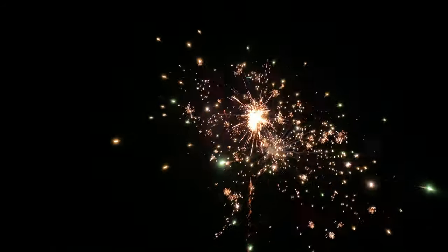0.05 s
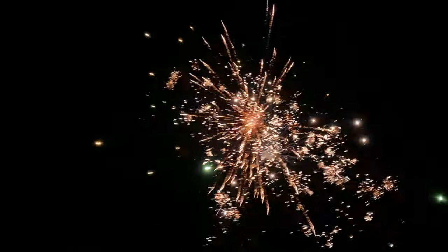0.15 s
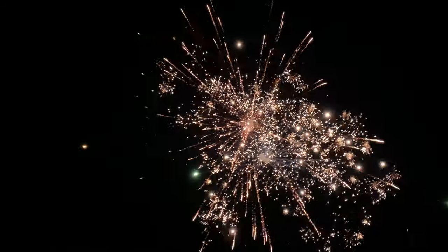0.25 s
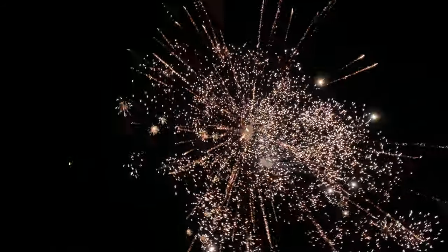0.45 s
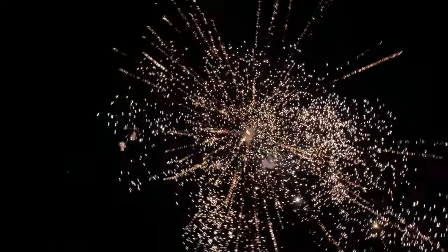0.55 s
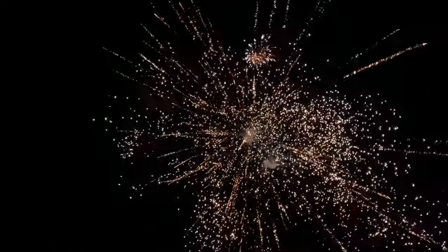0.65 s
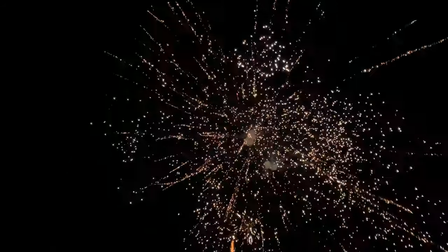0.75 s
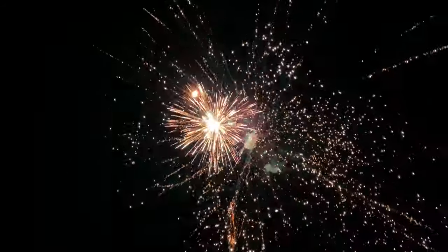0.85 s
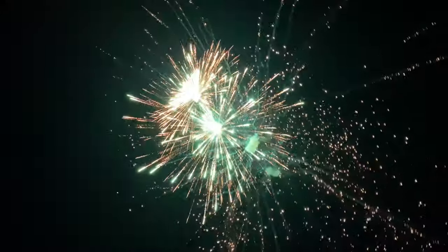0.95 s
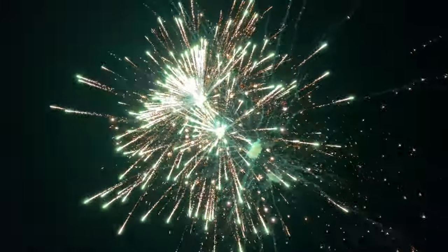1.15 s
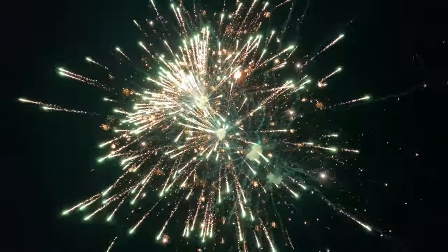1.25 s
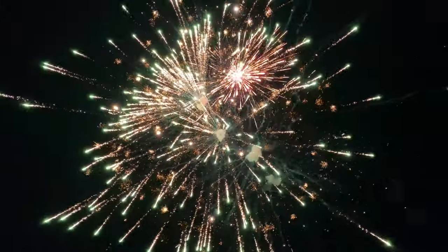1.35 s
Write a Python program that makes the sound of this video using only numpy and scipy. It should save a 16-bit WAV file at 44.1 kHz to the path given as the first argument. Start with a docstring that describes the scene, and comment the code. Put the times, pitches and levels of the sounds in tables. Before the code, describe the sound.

Fireworks explode in the open night air. A dull thump opens over faint rumble and light sizzle; a hard, cracking bang hits at 0.2 seconds with a quick slap-back and low roll. Crackle swells around 0.4-0.7, with a short rasp and thump at 0.55, a weaker one at 0.7, and pops until 0.9. Two bangs strike at 1.02 and 1.08, echoing into sizzle until about 1.4.

```python
"""Fireworks outdoors at night

Three hard bangs, each a pressure pulse with a noisy crack, a slap-back and a low rolling echo of shaped noise.
Two short rasps of resonant noise each end in a thump, a dull pressure pulse; two more thumps stand alone.
Random impulses sizzle and tick, single clicks pop, and low noise rumbles faintly beneath.
All-pass dispersion delays the lows behind the highs, so each bang sweeps downward."""
import sys
import numpy as np
from scipy import signal
from scipy.fft import rfft, irfft
from scipy.io import wavfile

SR = 44100
rng = np.random.default_rng(int(sys.argv[2]) if len(sys.argv) > 2 else 0)


def unload_audio(sound):
    """Save the sound as a 16-bit wav file, at the path given as the first command line argument."""
    columns = np.transpose(np.atleast_2d(sound))
    # keep every value between -1 and 1, then stretch to whole-number steps
    steps = np.round(np.clip(columns, -1, 1) * 32767)
    wavfile.write(sys.argv[1], SR, steps.astype(np.int16))


N = 61739
SIZE = 2 ** 17  # transform length, longer than the scene
FREQ = np.arange(SIZE // 2 + 1) * SR / SIZE  # Hz
TIME = np.arange(N) / SR  # s

# level of the sizzle and its ticks over time: (time [s], level [dB])
SIZZLE_LEVEL = [(0, -48), (.13, -63), (.2, -50), (.3, -53), (.4, -40), (.48, -37), (.535, -37),
                (.62, -45.5), (.68, -37.5), (.74, -39), (.8, -44), (.88, -47.5), (.93, -58.5), (1, -55),
                (1.2, -47), (1.31, -52), (1.4, -40.5)]
# colour of a star's snap: (frequency [Hz], gain [dB])
STAR_COLOUR = [(100, -27), (600, 4), (1500, 7.5), (3000, 1), (5500, 0), (9000, -12), (16000, -25.5)]
# spectrum of noise scattered off nearby things: (frequency [Hz], relative density [dB per Hz])
SCATTER_SPECTRUM = [(100, 3.5), (600, 8.5), (1500, 3.5), (2800, -7), (4500, -5.5), (6500, -10), (9000, -17),
                    (11000, -33), (12500, -37), (16000, -40.5)]

DIFFUSE_WIDTH, BASS_WIDTH, CRACK_WIDTH = 0.9, 0.54, 0.73  # gain of side relative to mid
SIZZLE_PER_S, SIZZLE_SPREAD_DB = 3300, 3.5  # rate in mid and in side; dB per unit exponential draw
TICKS_PER_S, TICKS_DB, TICKS_SPREAD_DB = 140, 12.5, 3  # size of the least tick, before the channel gains
BLAST_LOW_HZ = 69
AIR_DB, AIR_RISE_S, AIR_DECAY_S = -31, 0.0079, 0.1  # echo levels hold for the loudest blast
ROLL_DB, ROLL_DELAY_S, ROLL_RISE_S, ROLL_DECAY_S = -24.5, 0.095, 0.0078, 0.041
BOOM_HZ, BOOM_DB, BOOM_DELAY_S, BOOM_WIDTH_S = 52.05, -31.5, 0.12, 0.084  # half-width to 1/e
CRACK_S, SCATTER_S, SCATTER_DB = 0.0037, 0.0088, -2.5  # decay times; scatter level relative to the crack
RASP_FALL_S, RASP_OVERLAP_S, RASP_RING_Q = 0.0015, 0.0017, 28
RASP_TAIL_DB, RASP_TAIL_S = -11, 0.014  # level relative to the burst; decay time
POP_S, POP_NOISE_DB, POPS_DB = 0.0021, -15, -8  # fizz decay, fizz relative to click, gain of all pops
SWEEP_LOW_HZ, SWEEP_HIGH_HZ, SWEEP_DAMPING = 81, 767, 2.72
CEILING, TOP_HZ = 1.0, 16000


def undb(db):
    """Amplitude gain is ten to the power of decibels over twenty."""
    return 10 ** (np.asarray(db) / 20)


def filtered(x, response):
    """Linear filtering: the spectrum is multiplied by a frequency response."""
    return irfft(rfft(x, SIZE) * response, SIZE)[..., :N]


def colour(points):
    """Minimum phase: folding the cepstrum makes a causal response through (Hz, dB) points."""
    hz, db = np.array(points, float).T
    level_db = np.interp(np.log(FREQ + 1), np.log(hz), db)
    cepstrum = irfft(np.log(undb(level_db)))
    return np.exp(rfft(2 * cepstrum[:SIZE // 2], SIZE) - cepstrum[0])


def delay(seconds):
    """A pure delay is a phase lag proportional to frequency."""
    return np.exp(-2j * np.pi * FREQ * seconds)


def place(x, pan_db, lag_ms=0):
    """Binaural cues: level and arrival time differ between left and right."""
    sides = np.array([[.5], [-.5]])
    return filtered(x, undb(pan_db * sides) * delay(sides * lag_ms / 1000))


def spread(pair, points, width):
    """Mid-side stereo: an unrelated side signal lowers the channel correlation; rms 1."""
    mid, side = filtered(pair, colour(points))
    out = np.array([mid + width * side, mid - width * side])
    return out / np.sqrt(np.mean(out ** 2))


def noise(points, width):
    """Spectral shaping of white noise into coloured stereo noise."""
    return spread(rng.standard_normal((2, N)), points, width)


def fade(start, decay, rise=1e-4):
    """Exponential relaxation: a rise at start and a decay to silence."""
    age = np.maximum(TIME - start, 0)
    return (1 - np.exp(-age / rise)) * np.exp(-age / decay)


def curve(rows):
    """Gain that moves linearly in decibels between (s, dB) points."""
    return undb(np.interp(TIME, *np.array(rows).T))


def rumble():
    """Low-frequency noise under a slowly varying level is heard as a far rumble."""
    # level over time: (time [s], level [dB])
    rumble_level = [(0, -43.5), (.05, -43.5), (.12, -44.5), (.2, -43), (.45, -49.5), (.6, -45.5),
                    (.66, -47), (.76, -43.5), (.82, -47), (.96, -53), (1.15, -43), (1.32, -44), (1.4, -41)]
    # (frequency [Hz], relative density [dB per Hz])
    rumble_spectrum = [(20, -27), (45, -9), (80, 3), (160, 1), (270, -3.5), (500, -15.5), (1200, -29),
                       (4000, -29), (16000, -84)]
    return curve(rumble_level) * noise(rumble_spectrum, BASS_WIDTH)


def sizzle():
    """Dense random impulses: thousands of tiny reports of uneven size fuse into a sizzle."""
    # (frequency [Hz], relative density [dB per Hz])
    sizzle_spectrum = [(100, -11.5), (500, 1.5), (1200, 6), (2200, 0.5), (4000, -3.5), (6300, -5),
                       (8500, -16), (11000, -17.5), (12300, -37), (16000, -27)]
    hits = rng.random((2, N)) < SIZZLE_PER_S / SR
    size_db = SIZZLE_SPREAD_DB * np.minimum(rng.exponential(size=(2, N)), 5)
    sizes = undb(size_db) * rng.choice([-1, 1], (2, N))
    return curve(SIZZLE_LEVEL) * spread(hits * sizes, sizzle_spectrum, DIFFUSE_WIDTH)


def ticks():
    """Sparse random impulses: nearer stars stand out of the sizzle as separate ticks."""
    sizes = undb(TICKS_DB + TICKS_SPREAD_DB * np.minimum(rng.exponential(size=N), 3))
    hits = rng.random(N) < TICKS_PER_S / SR
    channel_gains = rng.uniform(0.3, 1, (2, N))
    return curve(SIZZLE_LEVEL) * filtered(hits * sizes * channel_gains, colour(STAR_COLOUR))


def blast(start, low_hz, high_hz, damping=np.sqrt(2)):
    """Blast wave: a steep pressure front, a slower fall and a suction after it."""
    # colour of the pulse: (frequency [Hz], gain [dB])
    blast_colour = [(30, -1.5), (100, -3), (300, 2.5), (500, -0.5), (1200, -2.5), (1900, -8.5),
                    (3000, -11.5), (8000, -6.5), (16000, -27.5)]
    s = 1j * FREQ / low_hz
    highpass = s ** 2 / (1 + damping * s + s ** 2)  # its undershoot is the suction
    body = highpass / (1 + 1j * FREQ / high_hz)
    return irfft(body * colour(blast_colour) * delay(start))[:N]


def thumps():
    """Low-passed blast waves: without crack or slap-back they sound dull; one ends each rasp."""
    # (start [s], gain [dB], low edge [Hz], high edge [Hz], damping [1], dull above [Hz],
    #  left over right [dB])
    thump_rows = [(0.001, 17, 70, 67.6, 0.35, 194, -3), (0.5541, 34, 63.3, 220, 0.61, 600, 8),
                  (0.7085, 26, 74.4, 59.6, 0.42, 296, 3.5), (0.74, 13, 98, 94, 0.17, 260, 4.5)]
    out = 0
    for start, db, low_hz, high_hz, damping, dull_hz, pan_db in thump_rows:
        pulse = blast(start, low_hz, high_hz, damping)
        thud = filtered(pulse, 1 / np.hypot(1, (FREQ / dull_hz) ** 4))
        out = out + place(undb(db) * thud, pan_db)
    return out


def echoes(start):
    """Reverberation of the surroundings: a bright wash, then a low roll and a deep boom."""
    # spectra of the wash and of the roll: (frequency [Hz], relative density [dB per Hz])
    air_spectrum = [(100, -4), (400, 9.5), (1000, 0), (2200, -1), (4000, -10), (6500, -10), (8500, -19),
                    (11000, -21.5), (12300, -44.5), (16000, -38)]
    roll_spectrum = [(30, -17), (60, -1), (130, 3), (300, 1), (520, -3), (800, -28), (2500, -19),
                     (8000, -33), (16000, -70)]
    air = undb(AIR_DB) * fade(start, AIR_DECAY_S, AIR_RISE_S) * noise(air_spectrum, DIFFUSE_WIDTH)
    roll_shape = fade(start + ROLL_DELAY_S, ROLL_DECAY_S, ROLL_RISE_S)
    roll = undb(ROLL_DB) * roll_shape * noise(roll_spectrum, BASS_WIDTH)
    age = np.maximum(TIME - start, 0)
    boom_shape = np.exp(-((age - BOOM_DELAY_S) / BOOM_WIDTH_S) ** 2)
    boom = undb(BOOM_DB) * np.sin(2 * np.pi * BOOM_HZ * age) * boom_shape
    return air + roll + boom


def bangs():
    """Direct sound and reflections: a blast with ragged crack, a near slap-back, then far echoes."""
    # (start [s], blast gain [dB], high edge of the body [Hz], crack level [dB], slap-back delay [s],
    #  slap-back gain [dB], left over right [dB], left lag behind right [ms])
    bang_rows = [(0.2116, 44, 122, -13.5, 0.011, -9, -3.5, -0.042),
                 (1.0198, 43, 130, -13.5, .01083, -9, -2, -0.039),
                 (1.084, 39.5, 182, -13.5, .01095, -8.5, -.5, -0.043)]
    # colour of the slap-back: (frequency [Hz], gain [dB])
    slap_colour = [(50, 8.5), (200, 2.5), (600, 2), (2000, 9.5), (4000, -8), (7000, 6.5), (10500, -14.5),
                   (12500, -22), (16000, -8.5)]
    # spectrum of the crack: (frequency [Hz], relative density [dB per Hz])
    crack_spectrum = [(100, -4.5), (600, 4), (1400, 5), (2800, -2), (4400, -1), (7000, -8.5),
                      (10000, -11.5), (16000, -19.5)]
    out, loudest = 0, max(row[1] for row in bang_rows)
    for start, db, high_hz, crack_db, slap_s, slap_db, pan_db, lag_ms in bang_rows:
        crack = undb(crack_db) * fade(start, CRACK_S) * noise(crack_spectrum, CRACK_WIDTH)
        direct = undb(db) * blast(start, BLAST_LOW_HZ, high_hz) + crack
        slap = undb(slap_db) * filtered(direct, colour(slap_colour) * delay(slap_s))
        scatter_shape = undb(crack_db + SCATTER_DB) * fade(start + slap_s, SCATTER_S)
        scatter = scatter_shape * noise(SCATTER_SPECTRUM, DIFFUSE_WIDTH)
        far = undb(db - loudest) * echoes(start)
        out = out + place(direct + slap, pan_db, lag_ms) + scatter + far
    return out


def rasp(*rings):
    """Resonance: narrow peaks, each given as (Hz, dB), ring in bright noise."""
    # (frequency [Hz], relative density [dB per Hz])
    rasp_spectrum = [(100, -24.5), (400, -22.5), (800, -8), (1300, -8.5), (2100, 0.5), (2650, -7),
                     (3600, -3), (4750, -14), (6500, -3.5), (9000, -16), (11000, -19), (12500, -38),
                     (16000, -25)]
    ring = 1 + sum(undb(db) / (1 + 2j * RASP_RING_Q * (FREQ / hz - 1)) for hz, db in rings)
    return spread(filtered(rng.standard_normal((2, N)), ring), rasp_spectrum, CRACK_WIDTH)


def bursts():
    """Envelope modulation: a rasp swells for a few milliseconds, holds, and breaks off into a tail."""
    # (end before the overlap [s], level [dB], hold [s], swell time constant [s], low ring [Hz],
    #  its gain [dB], high ring [Hz], its gain [dB], left lag behind right [ms])
    burst_rows = [(0.5538, -9, 0.0068, 0.0022, 1269, 17, 3214, 10, -0.016),
                  (0.707, -27, 0.0011, 0.0038, 2110, 4, 5370, 22.5, 0.03)]
    out = 0
    for start, db, length, swell, low_hz, low_db, high_hz, high_db, lag_ms in burst_rows:
        end = start + RASP_OVERLAP_S
        log_rise = np.minimum(TIME - end + length, 0) / swell
        log_fall = np.maximum(TIME - end, 0) / RASP_FALL_S
        body = np.exp(log_rise - log_fall) * rasp((low_hz, low_db), (high_hz, high_db))
        tail = undb(RASP_TAIL_DB) * fade(end, RASP_TAIL_S) * noise(SCATTER_SPECTRUM, DIFFUSE_WIDTH)
        out = out + place(undb(db) * (body + tail), 0, lag_ms)
    return out


def pops():
    """Impulse excitation: single stars snap as clicks, each with a tiny fizz of decaying noise."""
    # (start [s], level before the gain of all pops [dB], left over right [dB])
    pop_rows = [(.666, -12, -2), (0.676, -14, -5), (0.742, -12.5, -7), (.753, -16, 6), (0.7726, -14.5, 17),
                (0.781, -8, -14.5), (0.81, -13.5, 1), (0.825, -14.5, 0), (0.8488, -14, -1),
                (0.852, -10.5, -2), (0.86, -24, 0), (.884, -22, -10), (0.8941, -4.5, 1.5), (.904, -9, -3)]
    out = np.zeros((2, N))
    for start, db, pan_db in pop_rows:
        snap = undb(POP_NOISE_DB) * fade(start, POP_S) * rng.standard_normal((2, N))
        snap[:, int(start * SR)] += 1
        out += snap * undb(db + np.array([[.5], [-.5]]) * pan_db)
    return filtered(out, colour(STAR_COLOUR)) * undb(POPS_DB)


def scene():
    """Superposition: the pressures of all the fireworks add to the far rumble."""
    return rumble() + sizzle() + ticks() + thumps() + bangs() + bursts() + pops()


def sweep(x, count):
    """Dispersion: a chain of all-pass stages holds the lows back behind the highs."""
    response = 1
    for hz in np.geomspace(SWEEP_LOW_HZ, SWEEP_HIGH_HZ, count):
        s = 1j * FREQ / hz
        response = response * (1 - SWEEP_DAMPING * s + s ** 2) / (1 + SWEEP_DAMPING * s + s ** 2)
    return filtered(x, response)


def record(dry):
    """Dispersion, inverted polarity, saturation that rounds the loudest peaks, and a low-pass."""
    swept = -sweep(dry, count=5)
    rounded = swept / (1 + (swept / CEILING) ** 6) ** (1 / 6)
    lowpass = signal.ellip(8, .2, 70, TOP_HZ, fs=SR, output="sos")  # ripple and stopband in dB
    return signal.sosfilt(lowpass, rounded)


dry = scene()
out = record(dry)
unload_audio(out)
```